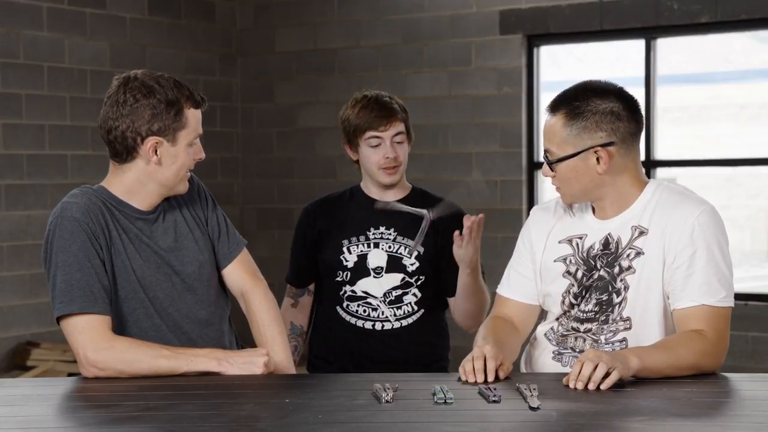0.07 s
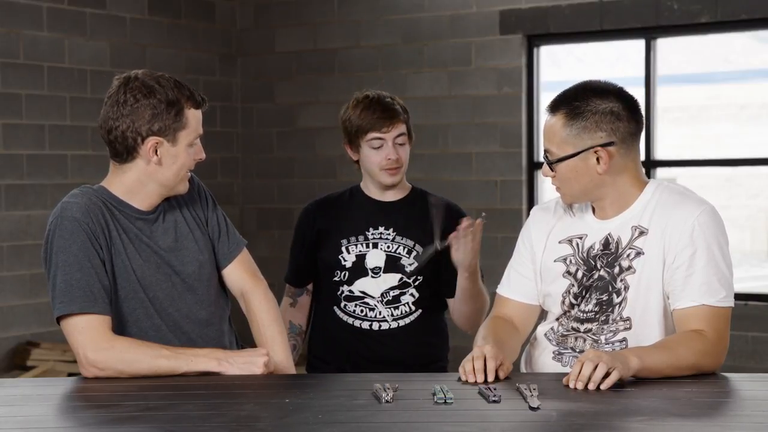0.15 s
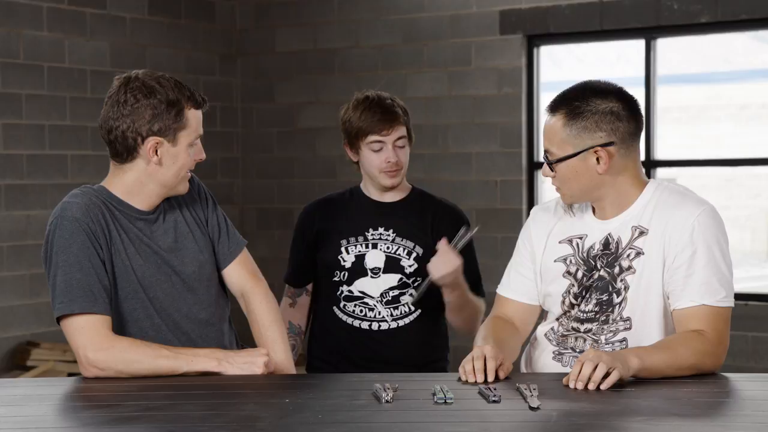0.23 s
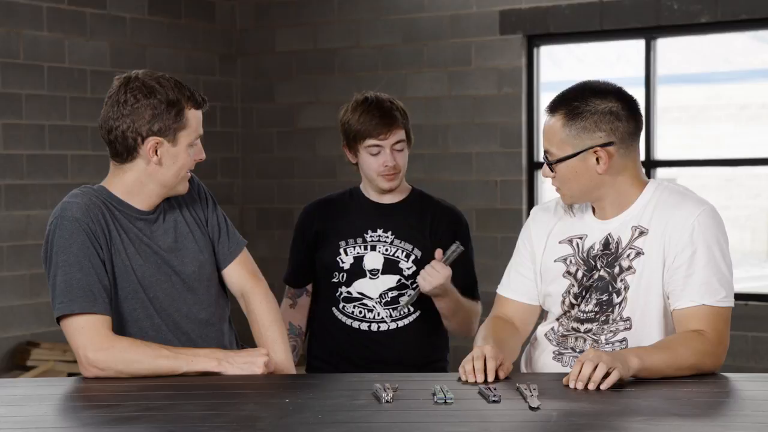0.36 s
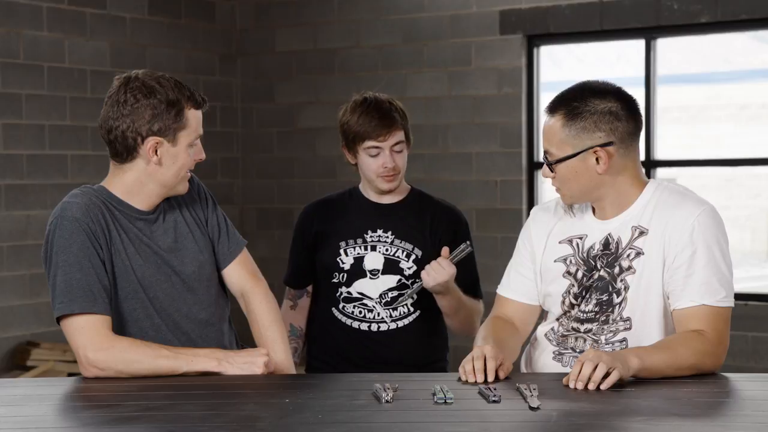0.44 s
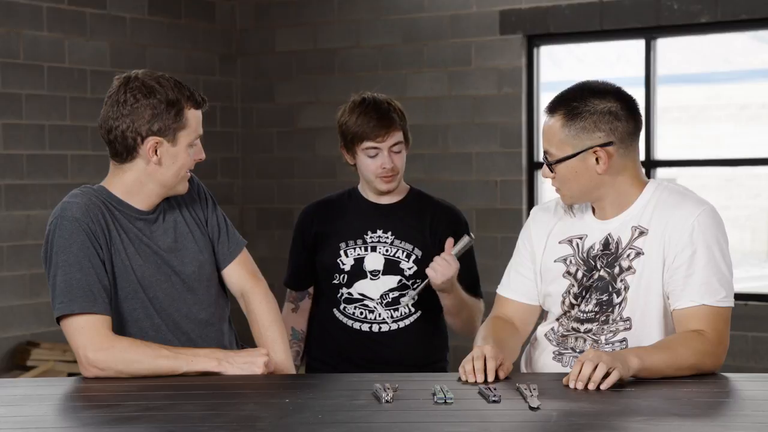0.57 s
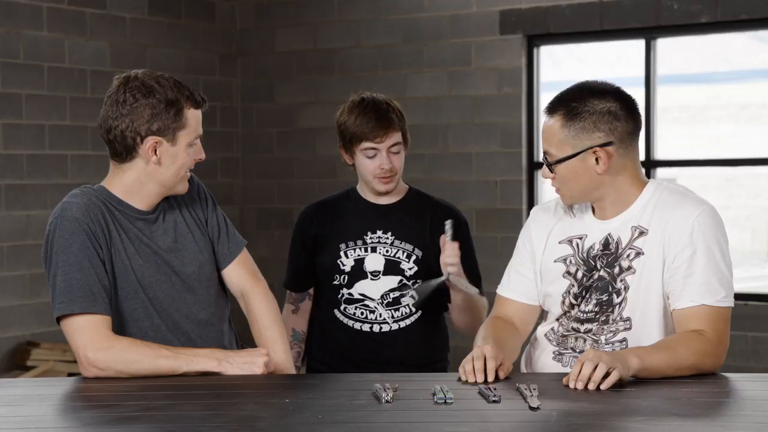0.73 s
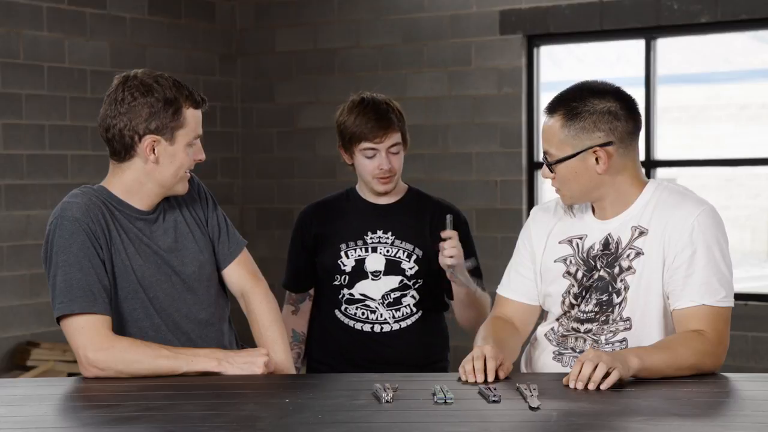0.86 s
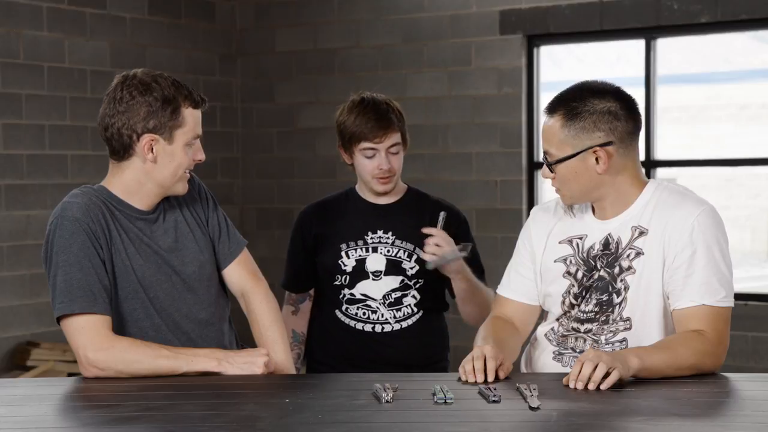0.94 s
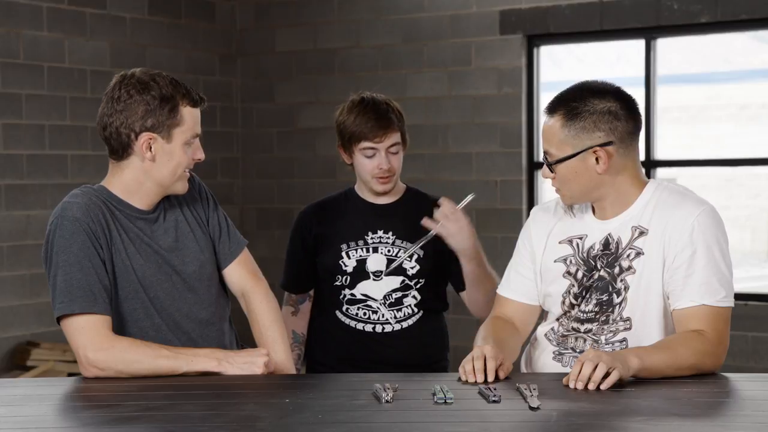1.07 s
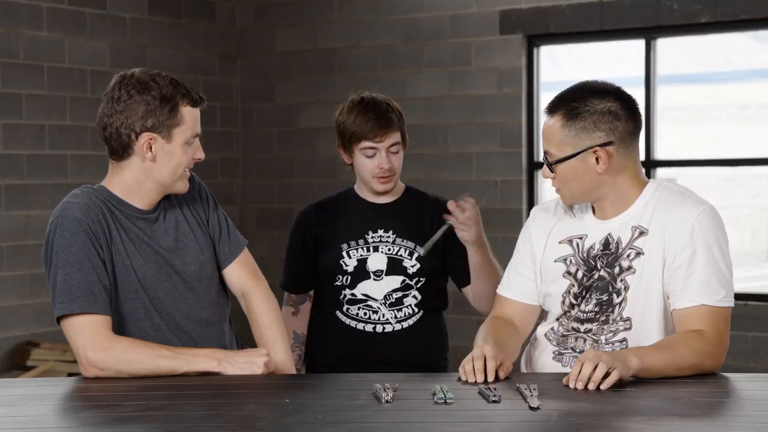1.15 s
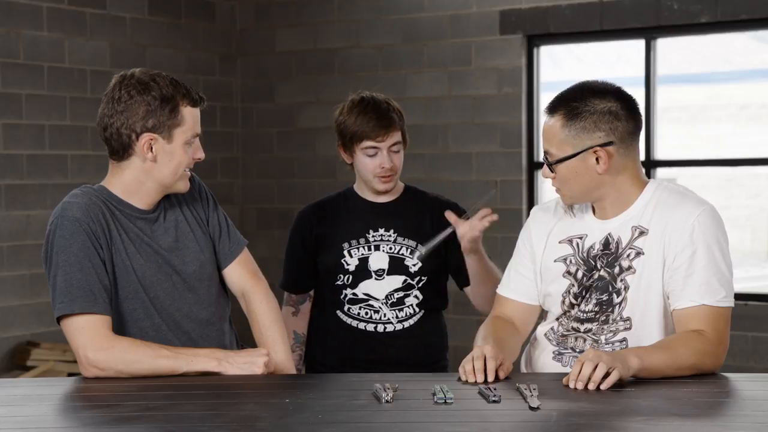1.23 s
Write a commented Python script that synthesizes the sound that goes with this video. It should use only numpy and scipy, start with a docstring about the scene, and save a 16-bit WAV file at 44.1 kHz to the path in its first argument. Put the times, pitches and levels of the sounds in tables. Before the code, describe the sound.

A butterfly knife is flipped by hand: a quick flurry of sharp metallic clicks, a lone double tick, then a softer rattle. It is heard close up in a quiet room with a faint low hum.

```python
"""Flipping a butterfly knife

Handles and blade chatter on their pivots and slap together: a loud flurry, a lone double tick, a
softer rattle. Each impact excites the damped modes of the steel, and the parts rub softly as they turn.
One close microphone hears it in a quiet room, with faint reverberation, low rumble and mains hum."""
import sys
import numpy as np
from scipy import signal
from scipy.fft import rfft, irfft
from scipy.io import wavfile

SR = 44100
rng = np.random.default_rng(int(sys.argv[2]) if len(sys.argv) > 2 else 0)


def unload_audio(sound):
    """Save the sound as a 16-bit wav file, at the path given as the first command line argument."""
    columns = np.transpose(np.atleast_2d(sound))
    # keep every value between -1 and 1, then stretch to whole-number steps
    steps = np.round(np.clip(columns, -1, 1) * 32767)
    wavfile.write(sys.argv[1], SR, steps.astype(np.int16))


N = 57330


def undb(db):
    """Amplitude ratio of a level in decibels."""
    return 10 ** (np.asarray(db) / 20)


def gain_at(hz, points):
    """Magnitude response, interpolated from (frequency [Hz], gain [dB]) on a log-frequency axis."""
    knot_hz, knot_db = np.array(points, float).T
    return undb(np.interp(np.log(np.maximum(hz, 1)), np.log(knot_hz), knot_db))


def colour(x, points, size=2048):
    """Minimum-phase filter: folding the cepstrum makes a magnitude response causal."""
    cepstrum = irfft(np.log(gain_at(np.fft.rfftfreq(size, 1 / SR), points)))
    cepstrum[1:size // 2] *= 2
    cepstrum[size // 2 + 1:] = 0
    return signal.fftconvolve(x, irfft(np.exp(rfft(cepstrum))))[:len(x)]


def unit(x):
    """Normalisation of each row to unit energy."""
    return x / np.sqrt(np.sum(x ** 2, axis=-1, keepdims=True))


def grains(count, spread=0.39):
    """Contact noise: dense micro-impacts with a log-normal spread of sizes, at unit rms."""
    x = rng.standard_normal(count) * np.exp(spread * rng.standard_normal(count))
    return x / x.std()


def ventilation(rms_db=-56):
    """Broadband air noise: a low rumble with a faint hiss above it."""
    # noise spectrum before the bass is shaped (frequency [Hz], relative density [dB])
    spectrum = [(12, -34), (20, -10), (77, 2.5), (187, -6.5), (337, -14), (388, -13.5), (472, -14.5),
                (624, -23), (1260, -27.5), (1610, -26), (2080, -33), (2390, -29.5), (2670, -33),
                (3740, -31.5), (4180, -32.5), (12800, -31.5), (16000, -33.5)]
    hz = np.fft.rfftfreq(N, 1 / SR)
    bass_shape = gain_at(hz, [(30, -5), (60, -9), (95, 2.5)])
    air = irfft(rfft(rng.standard_normal(N)) * gain_at(hz, spectrum) * bass_shape, N)
    return undb(rms_db) * air / air.std()


def mains_hum(waver=0.17):
    """Low partials waver under slow random modulation of amplitude and phase."""
    # hum partials (frequency [Hz], rms level [dB])
    partials = [(58.6, -58.5), (104, -61), (175, -65), (232, -72)]
    t = np.arange(N) / SR
    knots = np.linspace(0, t[-1], num=12)
    hum = np.zeros(N)
    for hz, db in partials:
        swell = 1 + waver * np.interp(t, knots, rng.standard_normal(len(knots)))
        drift = waver * hz / partials[0][0] * np.interp(t, knots, rng.standard_normal(len(knots)))
        hum += undb(db) * np.sqrt(2) * swell * np.sin(2 * np.pi * hz * t + drift)
    return hum


def impact(db, decay_ms, body_db, mid_db, presence_db, top_db, struck_hz, boost_db):
    """Impact excitation: metal chatters briefly on metal and the steel rings in damped normal modes."""
    # bass, body, hollow, mid, presence, reference and top bands (frequency [Hz])
    bands = [200, 560, 1400, 2800, 5700, 9500, 14000]
    # modes of handles and blade (frequency [Hz], relative energy [dB], T60 [s])
    steel_modes = [(2080, -22.5, 0.033), (2700, -22.5, 0.027), (3660, -19, 0.032), (4904, -18.5, 0.03),
                   (6050, -17, 0.02), (6490, -24.5, 0.029), (6930, -20.5, 0.072), (8450, -20, 0.035),
                   (9090, -17.5, .02), (9440, -19.5, 0.026), (9750, -16, 0.022), (10600, -16, 0.017),
                   (12100, -22, 0.027), (13150, -23, 0.058), (14750, -14, .016), (15500, -23, 0.018)]
    attack_s, scatter_db, detune = 0.00019, 1, 0.0083
    chatter_db, ring_db = -1, -1
    bass_db, hollow_db = body_db - 16, (body_db + mid_db) / 2 - 3.5
    tone = list(zip(bands, [bass_db, body_db, hollow_db, mid_db, presence_db, 0, top_db]))
    t = np.arange(SR // 6) / SR
    rise = 1 - np.exp(-t / attack_s)
    chatter = unit(grains(len(t)) * rise * np.exp(-t * 1000 / decay_ms))

    hz, mode_db, t60 = np.array(steel_modes).T
    hardest = np.arange(len(hz)) == np.argmin(abs(hz - struck_hz))
    excited_db = mode_db + boost_db * hardest + scatter_db * rng.standard_normal(len(hz))
    gains = undb(excited_db) * gain_at(hz, tone)
    hz = hz * (1 + detune * rng.standard_normal(len(hz)))  # the grip shifts the modes at each contact
    phase = 2 * np.pi * (hz[:, None] * t + rng.random((len(hz), 1)))
    ring = gains @ unit(np.sin(phase) * rise * np.exp(-np.log(1000) * t / t60[:, None]))
    strength = undb(db) * np.sqrt(0.005 * SR)  # energy of that level held for 5 ms
    return strength * (undb(chatter_db) * colour(chatter, tone) + undb(ring_db) * ring)


def clatter():
    """Superposed impacts, all filtered by the cavity resonances of the handles."""
    # contacts (time [s], level before filtering [dB], chatter time constant [ms], body [dB], mid [dB],
    # presence [dB], top [dB], struck mode [Hz], its boost [dB]); bands are relative to 9.5 kHz
    contacts = [ (0.2116, -38.5, 2.2, -25, -7, -1, 7, 9780, 11),
                (0.2134, -29, 6.2, -31, -12, -11, 2, 14750, 8),
                (.2222, -27, 1.6, -25, -1.5, -6, -6, 2700, 8.5),
                (.2235, -22.5, 0.87, -40, -17, -1, -1, 9750, 11.5),
                (0.2534, -27.5, 3.3, -21, -8, -4, -5, 6050, 6),
                (0.261, -29.5, 0.43, -7.5, 6, 3.5, -5, 3680, 3),
                (.2622, -32, 3.0, -14, 3, 1.5, -7, 4880, 14.5), (0.2746, -37, 3, -11, -19, -4, -7, 9780, 8),
                (0.29, -39, 3.1, -17, -18, -2, 4, 6930, 6), (0.2956, -23.5, 3.1, -12, -2, 3.5, 1, 6400, 17),
                (.3048, -43.5, 3.8, -4, -6, 0, 9, 13150, 8), (0.3134, -38.5, 4, -9, -9, -4, 7, 3680, 0),
                (0.3178, -21.5, 2.4, -14, -7.5, -3.5, -6, 8400, 11.5),
                (0.321, -33.5, 3, -15, 5, 2, -6, 15500, 13), (0.3317, -25, 2.3, 0, -3.5, -10, -4, 9220, 16),
                (0.333, -25.5, 1.9, -8.5, -3.5, 6, 6.5, 15500, 20),
                (0.3349, -19.5, 1.9, -11, -2.5, -7.5, -30, 9500, 7),
                (0.3496, -36, 2, 3.5, -2, 3, 4, 8400, 8), (.3580, -37.5, 2.9, 1.5, -15, -10, -8, 9500, 0),
                (.3632, -41.5, 3.6, -15, 0, -3, -2, 9220, -13), (.3660, -32, 3.8, 2, -7, -9, -21, 2080, 11),
                (.4400, -46, 1.4, -28, -7, -8, -15, 2080, 25),
                (.4485, -40, 1.8, -22, 1.5, 0.5, -4, 2080, 22),
                (.4990, -43.5, 1.3, -8, -14, -6.5, -27, 2080, 24.5),
                (0.7327, -35.5, 2.5, -22, -19, -10, -6, 8400, 11.5),
                (0.7376, -34.5, 3, -33, -21, -10, -8, 6930, 9.5),
                (.8770, -54, 5.6, -19, -3, -6, 0, 12100, 15), (0.9581, -41, 1.8, -31, -10, -9, -9, 6930, 7),
                (0.9997, -39, 1.7, -25, -21, -19, -7, 6050, 16),
                (1.0019, -38, 0.9, -10, -14, -12, -19, 10600, -2),
                (1.0241, -30, 2.9, -26, -9, -5, -11, 9220, 5),
                (1.0299, -27, 6.4, -19, -22.5, -13, -5, 12100, 13),
                (1.0382, -34, 3.8, -22, -19, -12, -17, 6930, -2),
                (1.0627, -38.5, 5.6, -8, -14, -6, -3, 3680, 13.5),
                (1.074, -43.5, 4.4, -23, -14, -4, -2, 6050, 16),
                (1.0791, -38.5, 1.1, -7.5, -13, -12, -18, 9780, 13),
                (1.0850, -35.5, 2.8, -30, -23, -17, -11, 6050, 15),
                (1.1384, -38.5, 2.7, -14, -26, -11, -5, 6930, 15.5),
                (1.1452, -45.5, 3.8, -8, -7.5, -3, -2, 6930, 20),
                (1.1977, -52, 2.5, -4, 2.5, -12, -6, 2750, 9),
                (1.2297, -49, 4.0, -12, -10, 1.5, -5, 8400, 13),
                (1.2510, -60, 2.2, -21, -4, -9, 2, 14750, 12),
                (1.2914, -49, 2, -16, -19, -0.5, 2, 9780, -2)]
    # response of the hollow handles (frequency [Hz], gain [dB])
    handle_response = [(430, -0.5), (700, 3), (900, -4), (1200, 1.5), (1650, -6), (2000, -1), (2700, -0.5),
                       (3100, -4.5), (3500, 1), (4300, -1.5), (4900, 0), (8000, -1)]
    track = np.zeros(N)
    for start_s, *contact in contacts:
        start = int(start_s * SR)
        click = impact(*contact)[:N - start]
        track[start:start + len(click)] += click
    return colour(track, handle_response)


def rubbing():
    """Sliding friction at pivots and handles: contact noise in brief Gaussian swells."""
    # slides (centre time [s], standard deviation [s], peak level before filtering [dB])
    slides = [(0.222, 0.0014, -34), (1.041, 0.0089, -55), (1.078, 0.011, -53.5), (1.122, 0.0066, -54),
              (1.136, 0.0032, -53), (1.227, .014, -58.5)]
    # friction spectrum (frequency [Hz], gain [dB])
    spectrum = [(500, -30.5), (1500, -2), (3700, 1.5), (5000, 0), (9000, -4), (12000, -16), (16000, -10)]
    t = np.arange(N) / SR
    swell = sum(undb(db) * np.exp(-((t - centre) / width) ** 2 / 2) for centre, width, db in slides)
    return colour(grains(N) * swell, spectrum)


def reverberation(x, gain_db=-14, low_t60_s=0.78, high_t60_s=0.46, build_s=0.0021):
    """Diffuse field: convolution with exponentially decaying noise whose treble dies first."""
    # room response (frequency [Hz], gain [dB])
    room_response = [(300, -7.5), (1000, 1), (1650, 0), (2400, 2), (3100, -2), (4500, -5), (7000, 3),
                     (9500, -2), (13000, -1.5), (16000, -10.5)]
    t = np.arange(int(0.8 * SR)) / SR
    noise = rng.standard_normal(len(t))
    low = signal.sosfiltfilt(signal.butter(2, 4500, fs=SR, output="sos"), noise)
    tail = low * np.exp(-np.log(1000) * t / low_t60_s)
    tail += (noise - low) * np.exp(-np.log(1000) * t / high_t60_s)
    build_up = 1 - np.exp(-(t / build_s) ** 2)
    tail = colour(unit(tail * build_up), room_response)
    return undb(gain_db) * signal.fftconvolve(x, tail)[:N]


def scene():
    """Direct sound, reverberation and background add at one point, the same in both channels."""
    knife = clatter() + rubbing()
    mix = knife + reverberation(knife) + ventilation() + mains_hum()
    return np.tile(mix, (2, 1))


def record(dry, cutoff_hz=15900):
    """Band limiting: the recorder's steep low-pass filter removes the highest treble."""
    return signal.sosfilt(signal.ellip(10, 0.1, 70, cutoff_hz, fs=SR, output="sos"), dry)


dry = scene()
out = record(dry)
unload_audio(out)
```